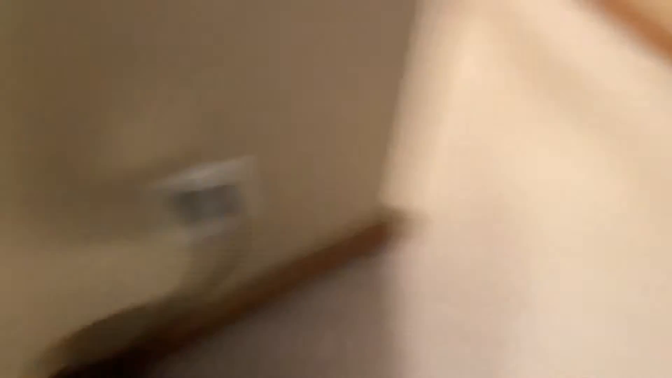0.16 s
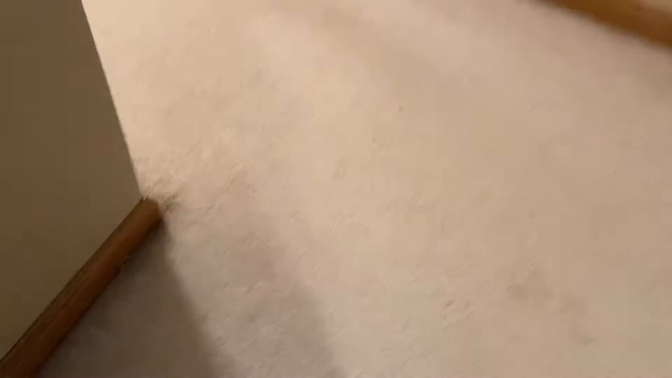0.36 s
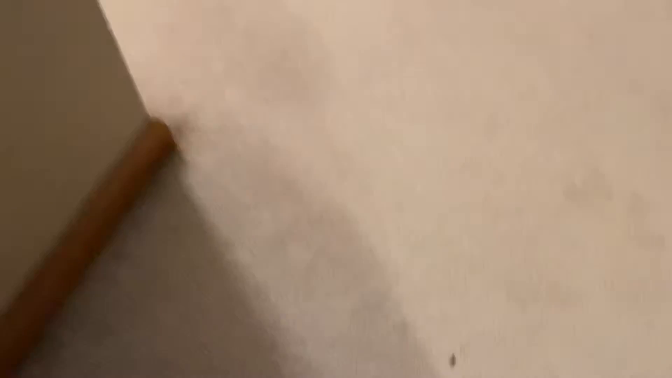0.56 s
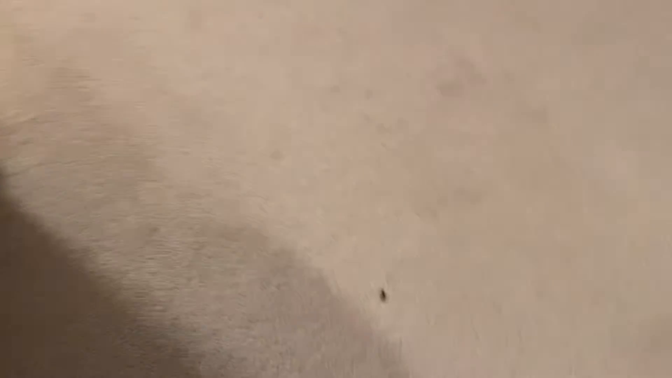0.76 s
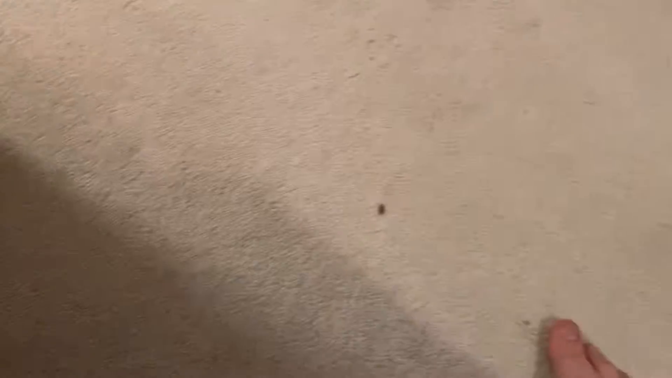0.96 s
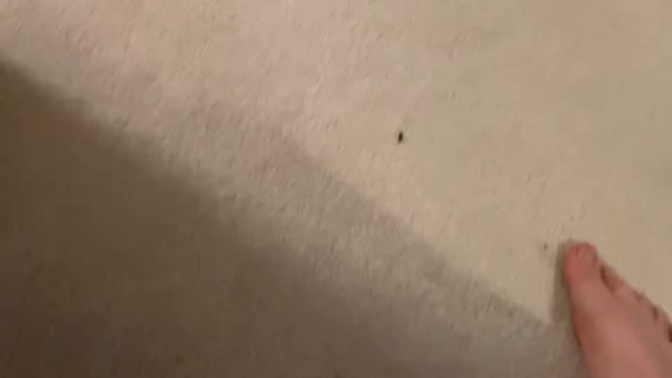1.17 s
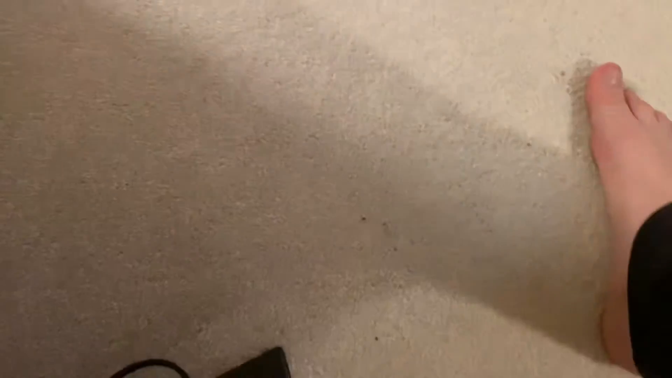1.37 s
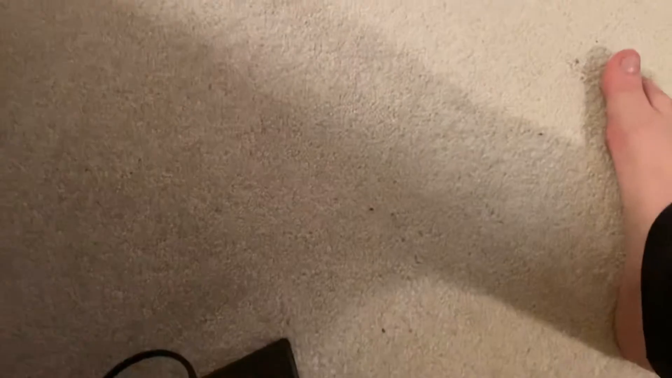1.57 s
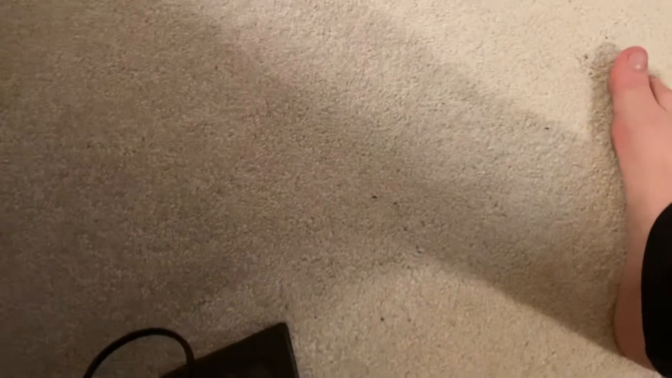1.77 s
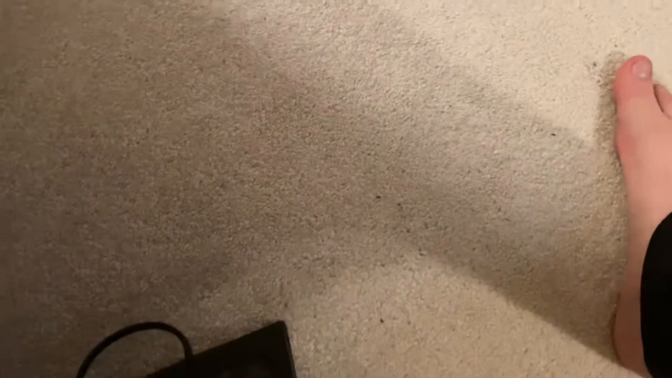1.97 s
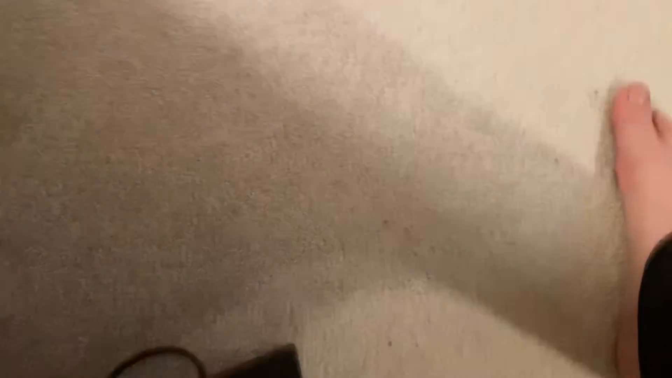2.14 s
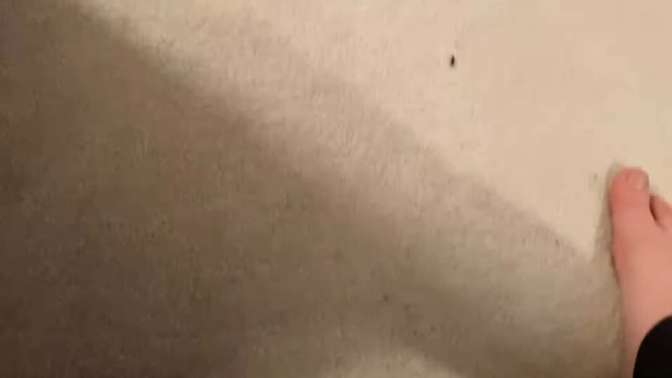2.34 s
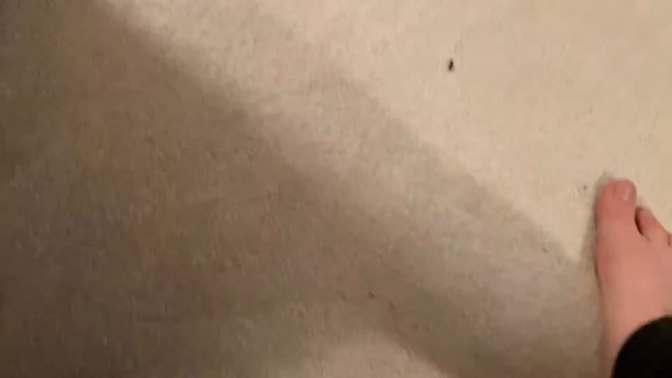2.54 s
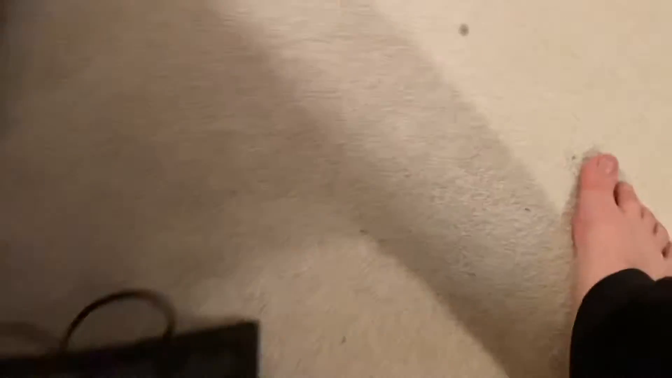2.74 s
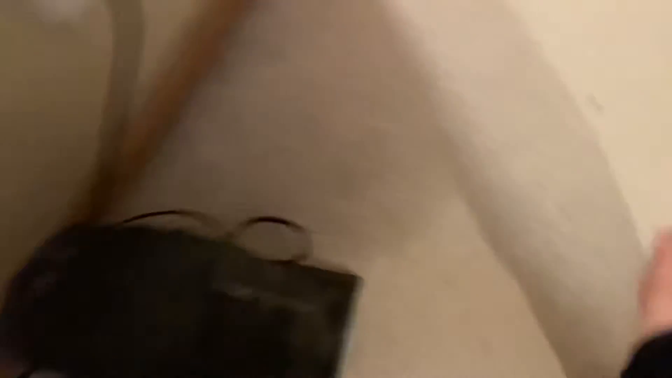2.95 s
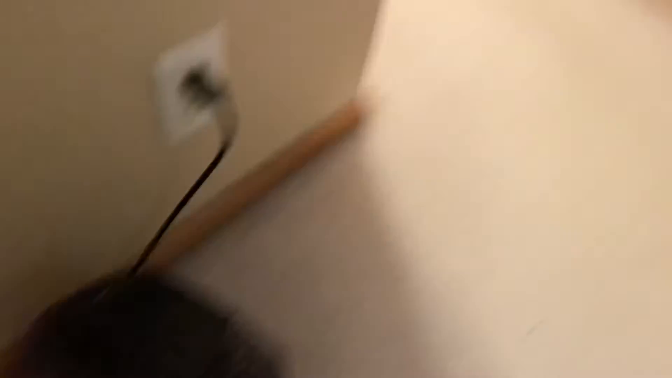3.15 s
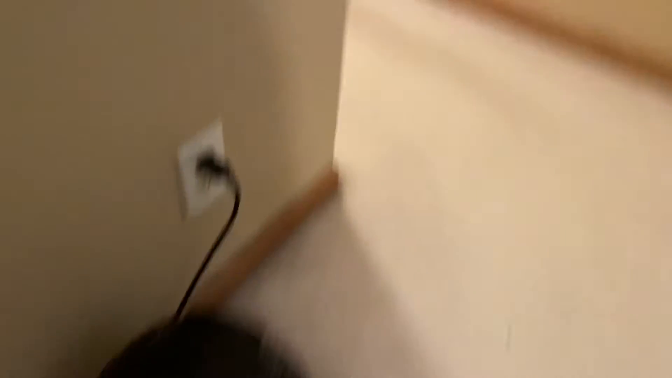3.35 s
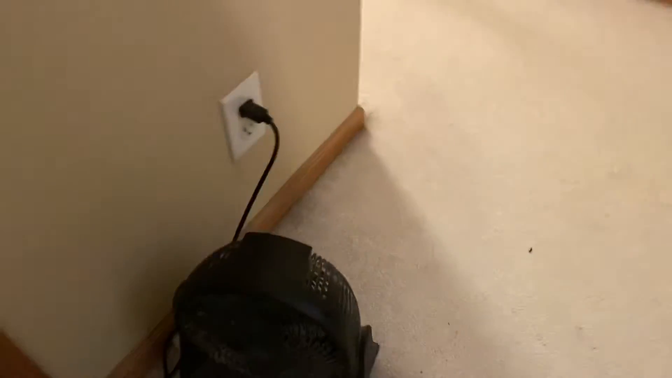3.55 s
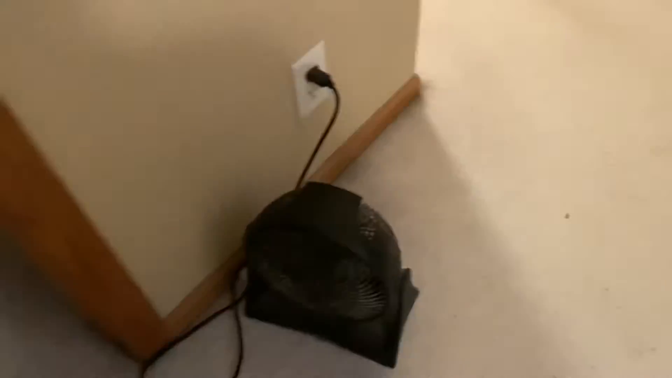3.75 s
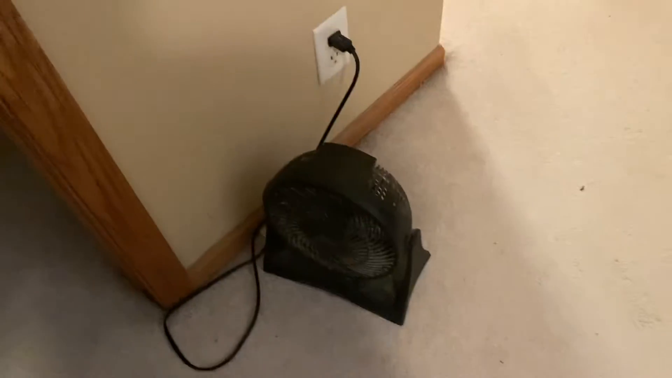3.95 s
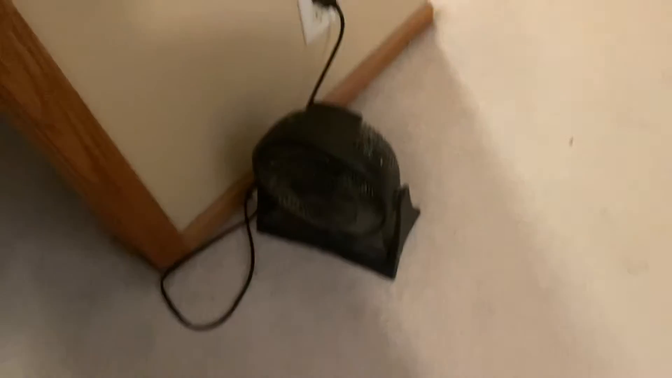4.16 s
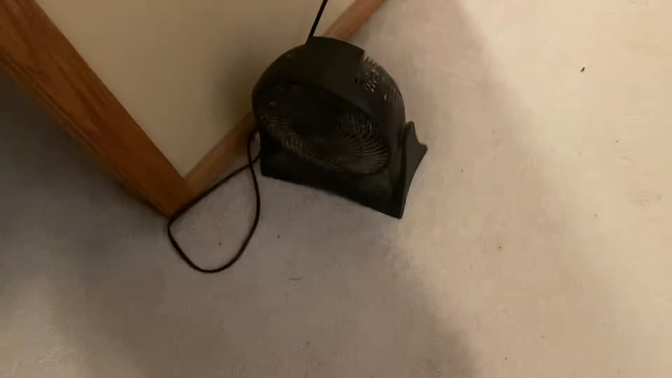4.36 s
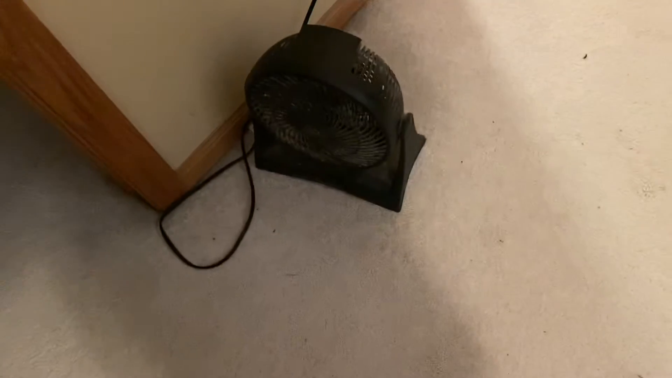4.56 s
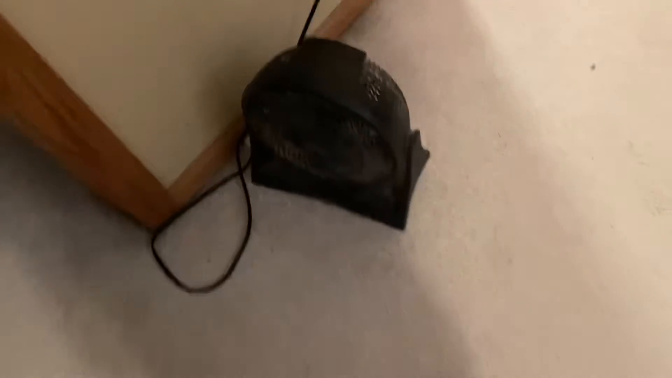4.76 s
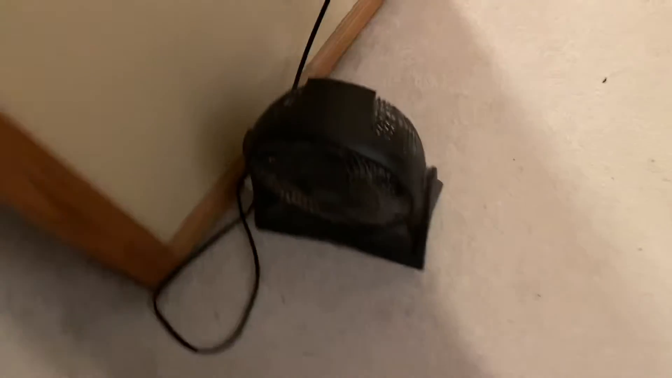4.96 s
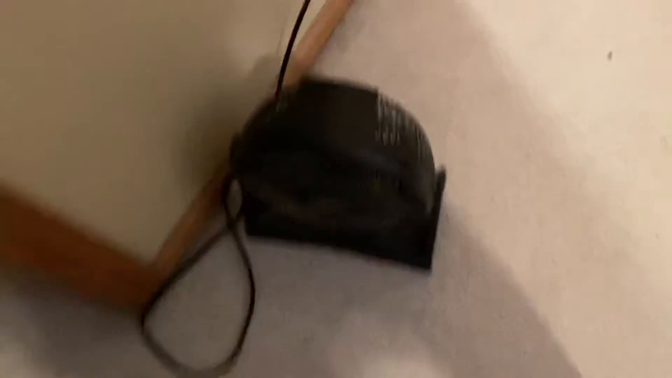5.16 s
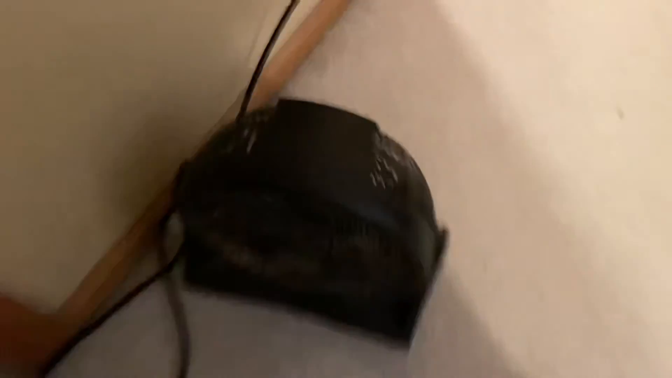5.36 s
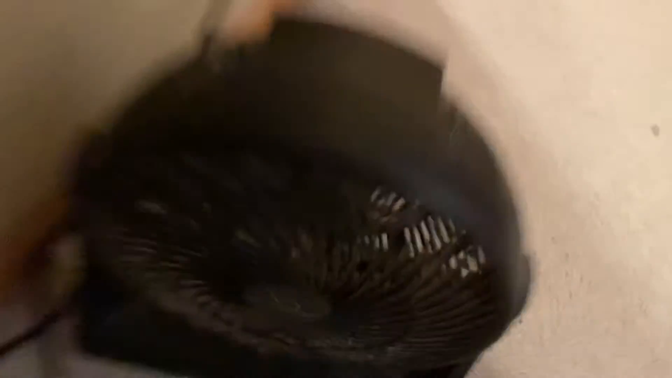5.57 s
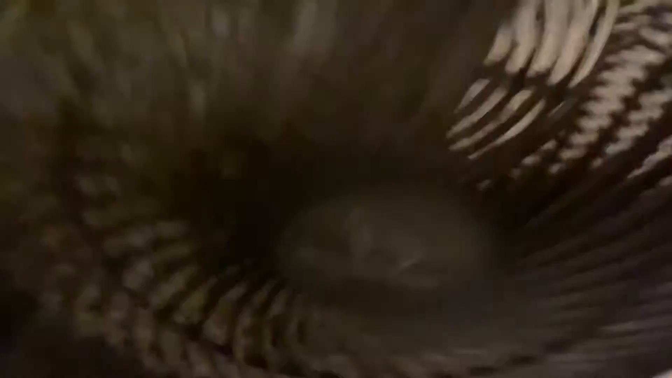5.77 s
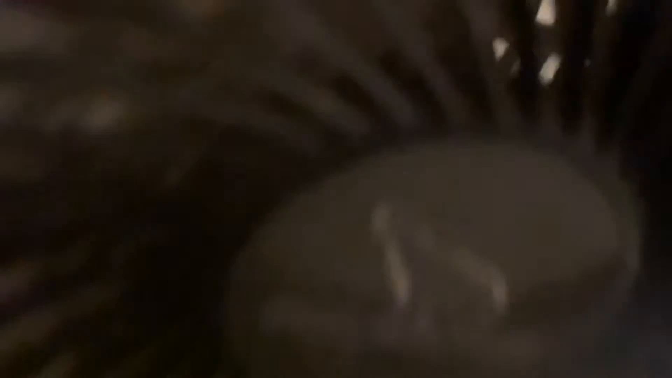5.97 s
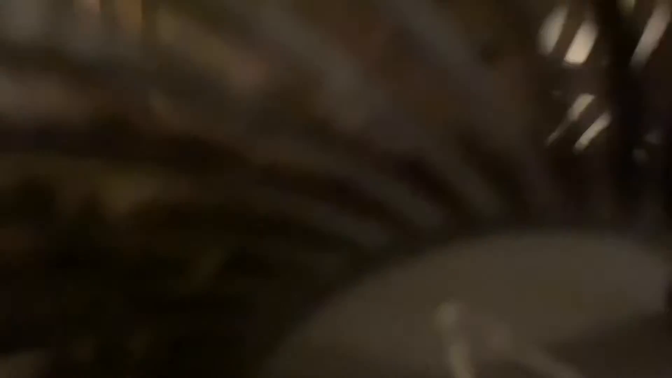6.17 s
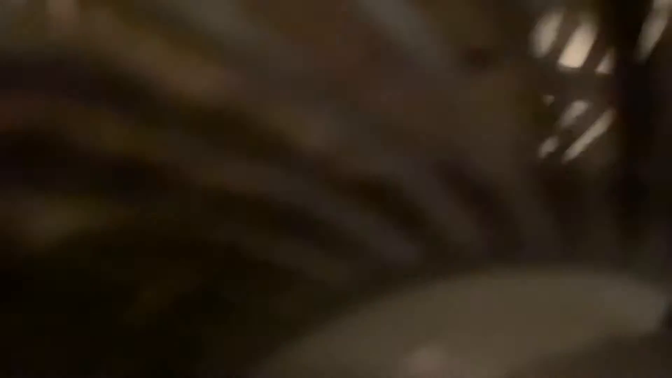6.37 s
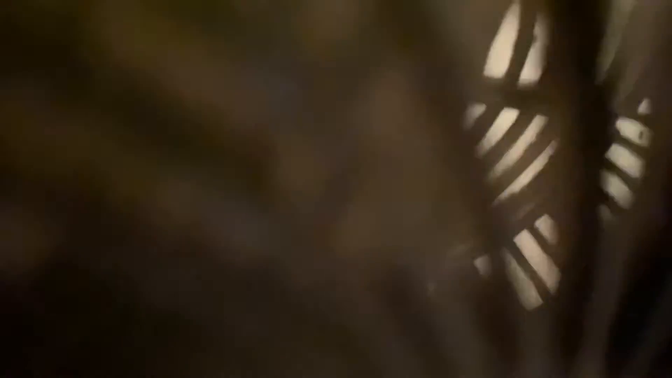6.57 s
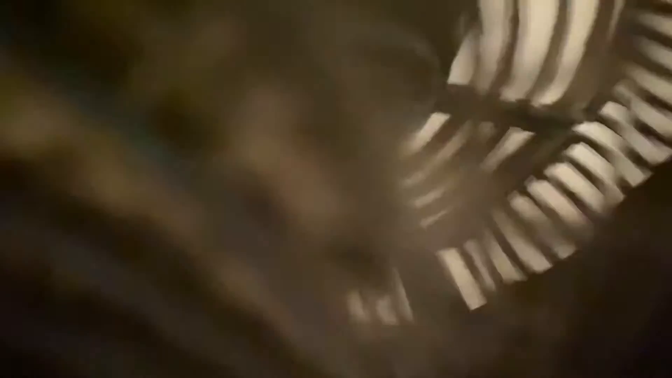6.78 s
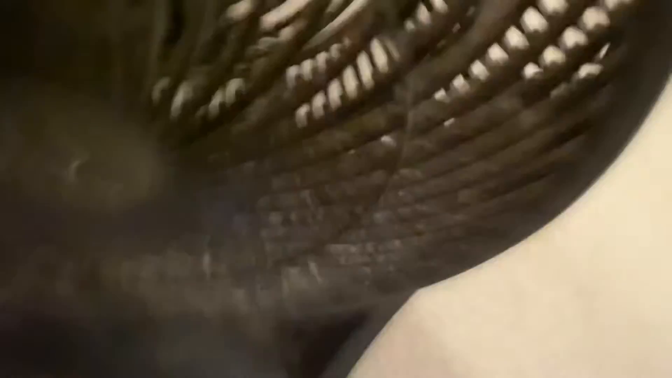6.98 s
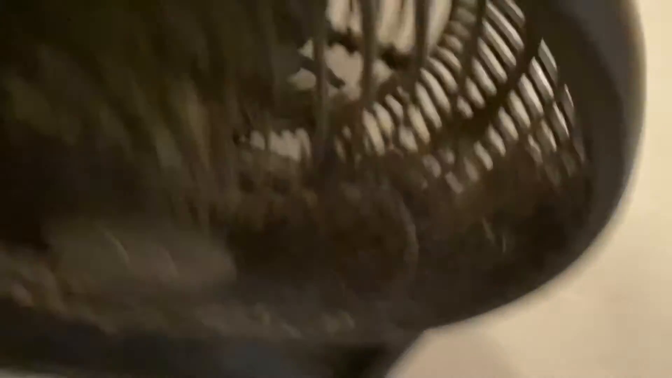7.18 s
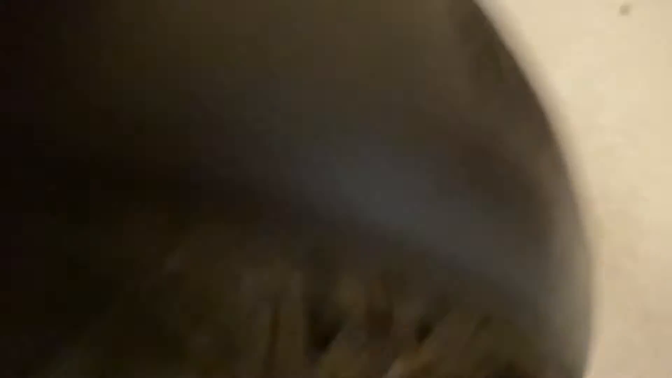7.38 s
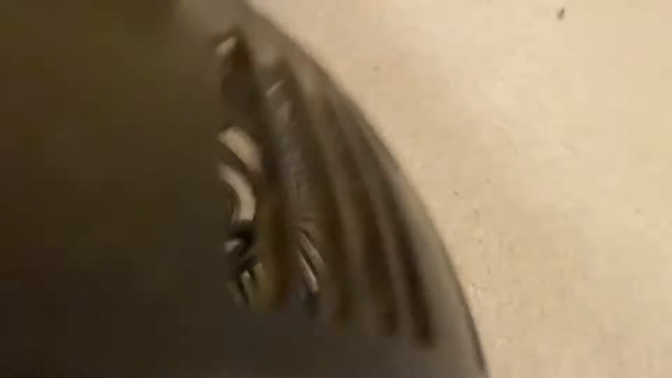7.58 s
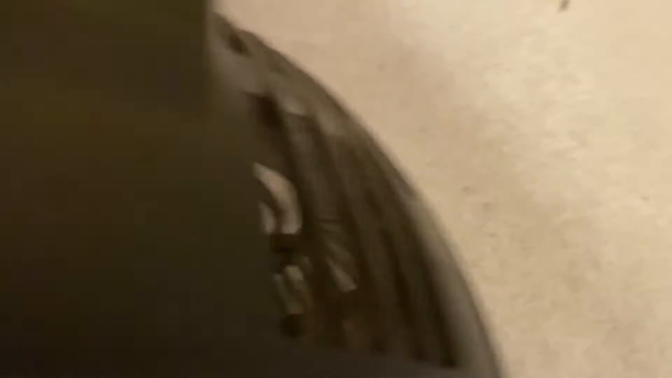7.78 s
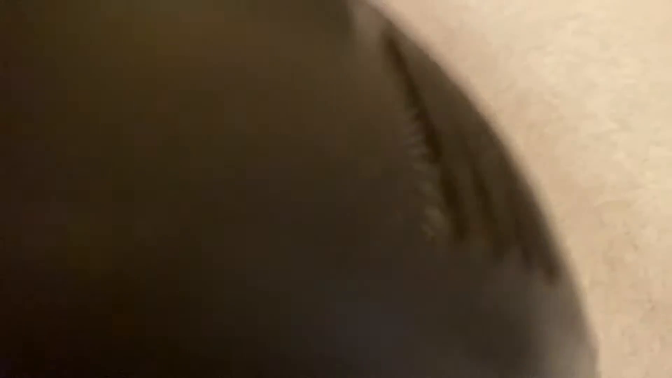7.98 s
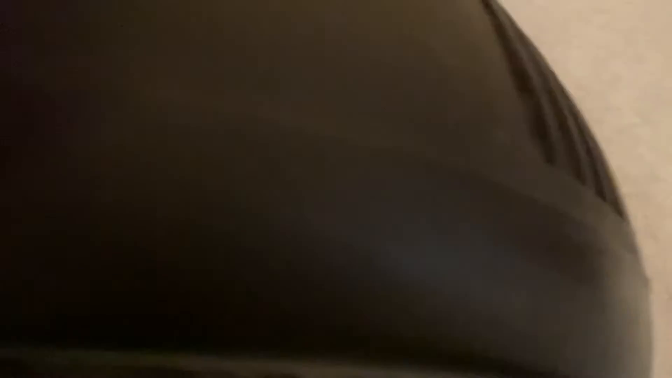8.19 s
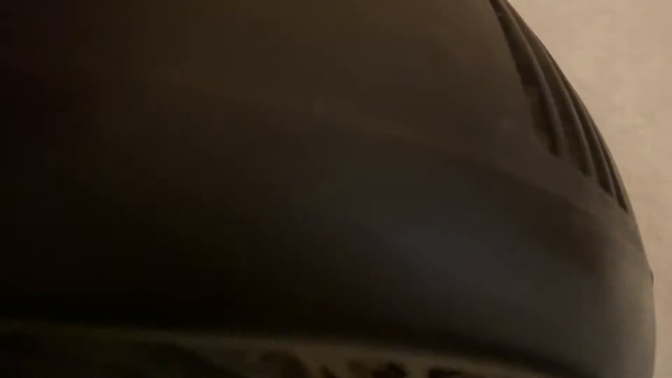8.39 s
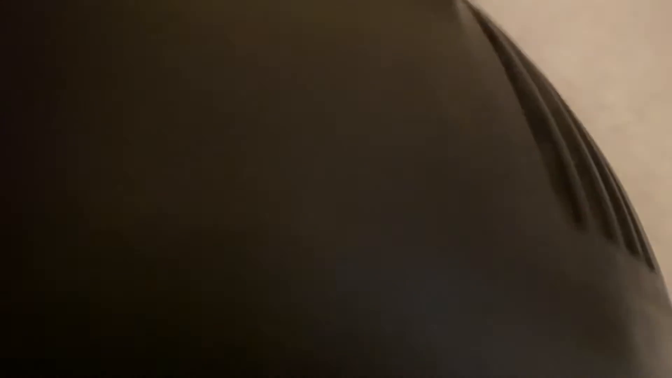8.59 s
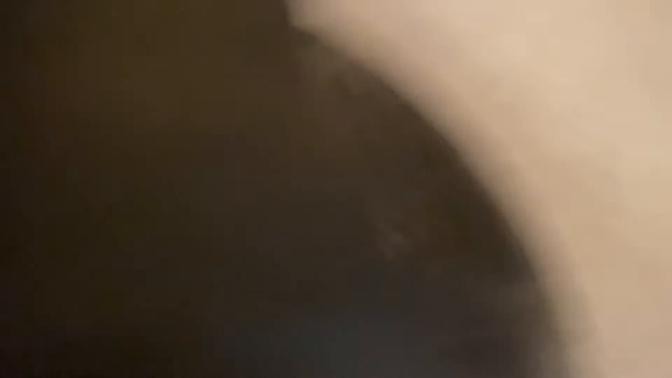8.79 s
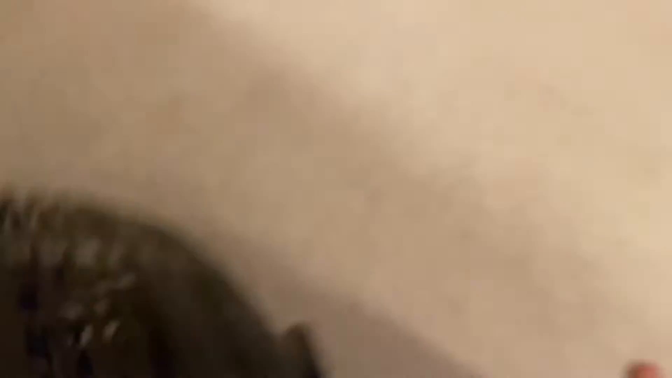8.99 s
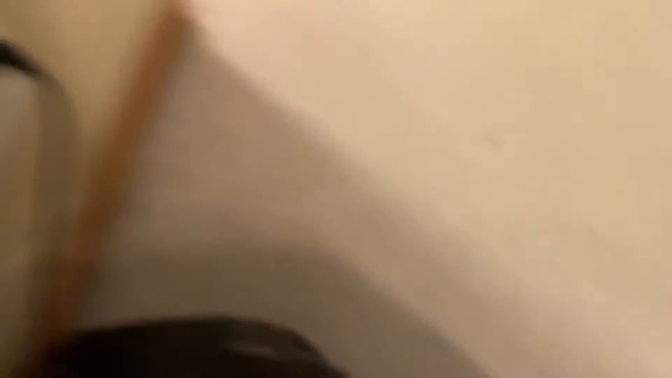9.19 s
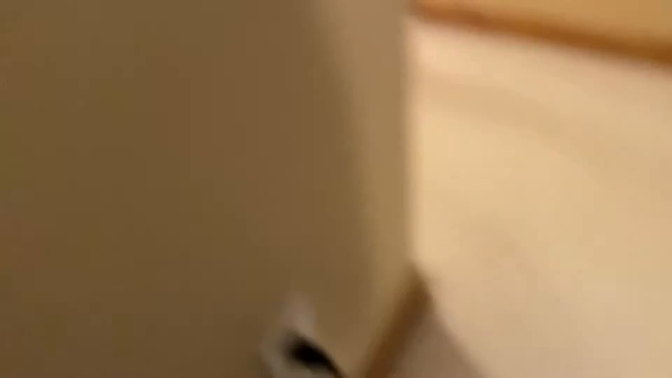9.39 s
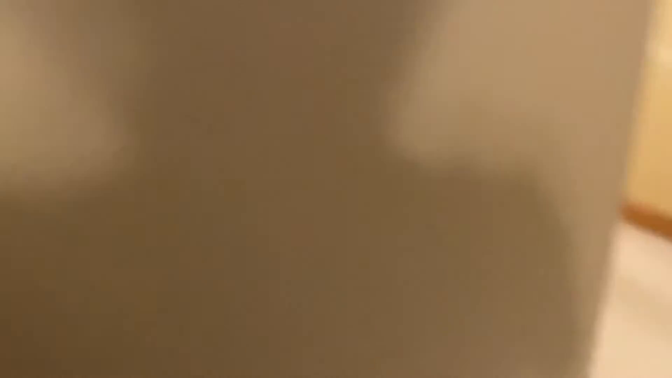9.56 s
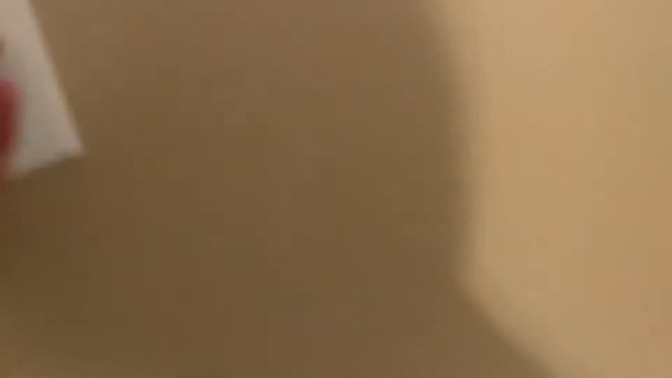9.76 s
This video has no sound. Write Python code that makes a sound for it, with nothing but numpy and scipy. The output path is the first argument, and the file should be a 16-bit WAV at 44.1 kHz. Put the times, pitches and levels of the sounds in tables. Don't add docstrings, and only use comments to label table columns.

```python
import sys
import numpy as np
from scipy import signal
from scipy.fft import rfft, irfft, next_fast_len
from scipy.io import wavfile
from scipy.ndimage import uniform_filter1d, map_coordinates

SR = 44100
rng = np.random.default_rng(int(sys.argv[2]) if len(sys.argv) > 2 else 0)


def wav_out(sig):
    wavfile.write(sys.argv[1], SR, np.round(np.clip(np.atleast_2d(sig).T, -1, 1) * 32767).astype(np.int16))


def gain_from_decibels(decibels):
    exponent = np.asarray(decibels, float) / 20
    return 10 ** exponent


N = 433503

ON_S, OFF_S = 2.3, 8.504
FULL_HZ = 143.2

# start_s, share_0_1
JET = [
    (5.6, 0),
    (5.85, 1),
    (6.6, 0.88),
    (6.9, 0.37),
    (7.1, 0.35),
]
# pitch_hz, width_hz, level_db
HALL_AND_CABINET_MODES = [(235, 19.5, 0), (394, 7.8, -4)]
# start_s, peak_db, knock_db, treble_db
HAND_TICKS = [(0.023, -41.5, 2, -1), (0.044, -45, -13, -8), (0.3087, -58, -20.5, -24),
              (0.4429, -52, -22, -23), (0.7722, -58, -8, -10), (0.8981, -30.5, -20, -9),
              (0.9091, -34.5, -19, -1.5), (0.9244, -42, -2, -13), (0.9677, -49, -15, -20),
              (1.162, -47, -28, -7.5), (1.177, -55, -19, -28), (1.296, -45.5, -12, -12),
              (1.5528, -51, -7, -33), (1.625, -71, -15, -30), (1.785, -62, -2, -20),
              (1.9063, -45, -18, -35), (1.964, -64, -20, -15), (2.0724, -57, -20, -25),
              (2.172, -62, -25, -20), (2.205, -64, -8, -30), (2.1, -40.5, -33, -6.5),
              (2.4244, -61, -17, -18), (2.855, -38.5, -22, -21), (3.1418, -57, -10, 1),
              (3.198, -54, 5, -25), (3.439, -55, -15, -32), (3.6147, -54, -15, -22.5),
              (3.6309, -50, -26, -22), (3.65, -49, -24, -27), (8.897, -39, -12, -22),
              (9.161, -44.5, -1, -38), (9.2616, -44, -10, -29), (9.2983, -44, -8, -34),
              (9.316, -45.5, -12, -31), (9.4894, -60, -15, -26), (9.678, -55, 10, -27)]
# start_s, peak_db, knock_db, treble_db
HOUSING_TAPS = [
    (4.8413, -34, -5, -9),
    (5.5614, -26, 3, -9.5),
    (6.516, -22, -24, -13),
    (6.697, -22, -6, -1.5),
    (7.9457, -25, -23, -16),
    (7.9671, -22, -11, -12),
    (8.5302, -33, -15, -19),
]
# start_s, peak_db, ring_s
SWITCHES = [
    (2.2806, -16.5, 0.027),
    (8.5415, -14, 0.033),
    (9.7973, -3.5, 0.1),
]


def unit(x):
    return x / np.sqrt(np.mean(x ** 2) + 1e-20)


def along(points, hz):
    f, v = np.transpose(points)
    return np.interp(np.log(hz + 1), np.log(f + 1), v)


def curves(rows):
    s, *cols = np.transpose(rows)
    return [np.interp(np.arange(N) / SR, s, c) for c in cols]


def wobble(rate_hz):
    knots = rng.standard_normal(int(N * rate_hz / SR) + 4)
    return map_coordinates(knots, [np.arange(N) * rate_hz / SR])


def filtered(x, response):
    m = next_fast_len(N + SR // 2)
    return irfft(rfft(x, m) * response(np.fft.rfftfreq(m, 1 / SR)), m)[..., :N]


def rush(spectrum, patchy_db):
    z = signal.stft(rng.standard_normal((2, N)), nperseg=512)[2]
    field = uniform_filter1d(rng.standard_normal(z.shape[1:]), size=6, axis=0)
    field = uniform_filter1d(field, size=12, axis=1)
    pair = signal.istft(z * gain_from_decibels(patchy_db * unit(field)), nperseg=512)[1][:, :N]
    return unit(filtered(pair, lambda hz: gain_from_decibels(along(spectrum, hz))))


def modes(rows):
    def response(f):
        total = 0
        for k, (c, w, db) in enumerate(rows):
            total = total + (-1) ** k * gain_from_decibels(db) * 1j * f * w / (c * c - f * f + 1j * f * w)
        return total
    return response


def speed():
    start_hz, climb_hz_per_s, drag = 43, 31.5, 0.0066
    brake_s, brake_hz, brake_rise_s, recover_s = 7.92, 13, 0.0954, 0.4145
    t = np.arange(N) / SR
    ramp = np.maximum(start_hz + climb_hz_per_s * (t - ON_S), 1)
    climb = (ramp ** -16. + FULL_HZ ** -16.) ** (-1 / 16)
    late = np.maximum(np.minimum(t, OFF_S) - brake_s, 0)
    running = climb - brake_hz * np.minimum(late / brake_rise_s, 1) * np.exp(-late / recover_s)
    return 1 / (1 / running + drag * np.maximum(t - OFF_S, 0))


def blade_tones(hz, turn, air_db, tone_db, near, jet, powered):
    # level_db, jet_change_db, coast_change_db
    multiples = [
        (1, 1.5, 3),
        (0, -12, 4),
        (-16, 0, 0),
    ]
    overtone_cap_db = 5.5
    standing = modes(HALL_AND_CABINET_MODES[:1])
    tones = 0
    for k, (db, jet_db, coast_db) in enumerate(multiples):
        capped_db = np.minimum(tone_db, overtone_cap_db if k else np.inf)
        shake_db = (0.9 + 2.4 * jet) * wobble(12) + 4 * (1 - near) * wobble(22)
        level_db = air_db + capped_db + db + jet_db * jet + coast_db * (0.5 - powered) * near + 0.5 + shake_db
        lift = 1 + 0.8 * (1 - near) * np.abs(standing((k + 1) * hz))
        tones = tones + gain_from_decibels(level_db) * lift * np.sin((k + 1) * turn)
    return tones


def motor_hum(air_db, jet, powered):
    hum_db, follows_air, buzz_fade_s = -16, 0.68, 0.79
    t = np.arange(N) / SR
    mains = 2 * np.pi * 120 * t
    level = powered * gain_from_decibels(hum_db + follows_air * air_db + 2.0 + 2.5 * jet + 1.7 * wobble(6))
    buzz = 0.28 * gain_from_decibels(4.5 * wobble(9.7)) * np.exp(-np.abs(t - ON_S) / buzz_fade_s)
    steady = np.sin(mains) + 0.26 * np.sin(2 * mains) + 0.086 * np.sin(4 * mains)
    return level * (steady + buzz * np.sin(6 * mains))


def rim_db(jet):
    return 2 * (1 - (2 * jet - 1) ** 2)


def rumble(air_db, wind_db, near, jet, powered):
    # level_hz, level_db_per_hz
    rumble_spectrum = [(13, -39), (30, 2), (92, -0.5), (130, -9), (170, -12), (290, -120)]
    floor_db, walk_s, walk_db = -56.5, 0.66, 9.5
    buffet_db, buffet_jet_db, coast_db = -1, -7.5, 4
    t = np.arange(N) / SR
    floor = gain_from_decibels(floor_db - walk_db * (t < walk_s))
    wind = gain_from_decibels(air_db + wind_db + buffet_db + buffet_jet_db * jet + coast_db * (1 - powered) + rim_db(jet))
    return gain_from_decibels(5.5) * np.hypot(floor, near ** 4 * wind) * rush(rumble_spectrum, patchy_db=-2.0)


def air(whoosh, grille, turn, air_db, bright_db):
    hiss_db, top_tilt, top_jet_db = -9, 0.27, 5
    flutter_db, steady_db = 2.2, -44
    jet = curves(JET)[0]
    eddies = np.array([wobble(25), wobble(25)])
    lumps = gain_from_decibels((1 + jet / 2) * eddies + (-14.0 - 0.72 * jet) * [[0], [1]])
    low = gain_from_decibels(air_db + rim_db(jet) + 2.5) * lumps * whoosh
    chop = 1 + 0.12 * np.sin(turn) + 0.25 * np.sin(2 * turn)
    flutter = 1.0 * jet + flutter_db * np.clip((steady_db - air_db) / 10, 0, 1)
    hiss = chop * gain_from_decibels(flutter * wobble(90)) * rush(grille, patchy_db=1.1)
    treble, top = filtered(hiss, lambda f: np.array([1 / (1 + (3500 / (f + 1)) ** 4), f > 9000])[:, None])
    bright_db = np.clip(bright_db, -30, 12)
    top_db = top_tilt * np.maximum(bright_db, -5) + top_jet_db * jet
    lift = (gain_from_decibels(bright_db) - 1) * treble + gain_from_decibels(bright_db) * (gain_from_decibels(top_db) - 1) * top
    return low + gain_from_decibels(air_db + hiss_db + 4) * (hiss + lift)


def fan():
    # start_s, closeness_db, tone_over_air_db
    hand = [(2.3, -43.5, -18), (3.6, -39.5, -15), (4.4, -38, -5.5), (5.4, -33.5, -7), (5.6, -28.5, -3.5),
            (5.8, -19, -4), (6.1, -16.5, 2), (6.4, -17, 2.5), (6.75, -17, 2.5), (7.0, -23, 3),
            (7.2, -25, 1), (7.65, -26, 11.5), (8.05, -25, 5), (8.54, -25.5, 6), (8.78, -28, 6),
            (9.0, -33.5, 2), (9.24, -40.5, -7), (9.6, -42.5, -10)]
    # start_s, treble_db, wind_db
    facing = [
        (5.3, 10.5, -2),
        (5.6, 7, -0.5),
        (5.85, 0.5, 1),
        (6.6, 0, -0.5),
        (6.85, 2, 2),
        (7.05, 4, -0.5),
        (7.25, 4, -1.5),
        (7.7, 1, 0.3),
        (8.5, 2, 0.2),
        (9, 3, -0.2),
    ]
    # start_s, share_0_1
    nearness = [
        (5.3, 0.2),
        (5.75, 0.96),
        (9, 1),
        (9.3, 0.1),
    ]
    # pitch_hz, level_db_per_hz
    whoosh_near, grille_near = [(70, -37), (100, 3), (150, 0), (250, -1), (400, -7.5), (700, -18),
                                (1200, -41), (4000, -66)], [(350, -2), (600, 0), (1000, -4), (1400, -5), (2100, -6.5),
                                                (2700, -9.5), (3200, -14), (5000, -20.5), (8000, -26),
                                                (12000, -33), (15600, -35), (16200, -72)]
    whoosh_far, grille_far = [(70, -10), (115, -22), (170, -7), (250, -2.5), (320, -5), (400, -2.5),
                              (550, -8.5), (750, -21.5), (1200, -40.5), (9000, -42), (15000, -53)], [(350, -22), (600, 2.5), (800, 0), (1100, -1), (1650, 2),
                                                  (2300, -6), (3500, -17.5), (5500, -38), (7500, -31),
                                                  (12000, -57), (15600, -60), (16200, -70)]
    air_db_per_decade = 53
    t, hz = np.arange(N) / SR, speed()
    close_db, tone_db = curves(hand)
    bright_db, wind_db = curves(facing)
    near, jet = curves(nearness)[0], curves(JET)[0]
    air_db = close_db + air_db_per_decade * np.log10(hz / FULL_HZ) - 60 * (t < ON_S)
    powered = uniform_filter1d(1. * (t > ON_S) * (t < OFF_S), size=2000)
    jitter = (0.0043 + 0.03015 * (1 - near)) * wobble(20) + 0.00498 * wobble(4)
    turn = 2 * np.pi * np.cumsum(hz * (1 + jitter)) / SR

    tones = blade_tones(hz, turn, air_db, tone_db, near, jet, powered)
    tonal = (tones + motor_hum(air_db, jet, powered)) * [[1], [0.35]]
    deep = rumble(air_db, wind_db, near, jet, powered) + tonal
    boom = filtered(rush(whoosh_far, patchy_db=1.0), lambda f: 1 + np.abs(modes(HALL_AND_CABINET_MODES)(f)))
    far_air = air(unit(boom), grille_far, turn, air_db, 0.69 * (air_db + 55.5))
    near_air = air(gain_from_decibels(wind_db) * rush(whoosh_near, patchy_db=1.0), grille_near, turn, air_db, bright_db)
    far = np.sqrt(1 - near) * (deep + far_air)
    return far, np.sqrt(near) * near_air + (1 - np.sqrt(1 - near)) * deep


def snaps():
    # pitch_hz, width_hz, level_db
    knob, dial, latch = [(770, 76, 1), (1750, 180, 1.5), (2680, 340, 2), (3460, 820, 0), (5950, 3000, -12),
                         (10700, 4800, -9.5)], [(1500, 520, 2), (2148, 650, 5.5), (2900, 680, 5), (4000, 900, -2),
                                       (5000, 900, -1.5), (7700, 1100, -2.5), (11600, 2500, -3.5),
                                       (14500, 2300, -2)], [(625, 290, -9), (970, 120, -4.5), (2070, 440, 0),
                                                     (2900, 320, 2), (3600, 530, -1), (4600, 690, -2.5),
                                                     (5400, 850, -9.5), (10500, 8100, -19)]
    out, t = np.zeros((2, N)), np.arange(SR // 8) / SR
    for (s, db, ring_s), body in zip(SWITCHES, (knob, dial, latch)):
        blow = np.zeros((2, N + SR))
        decay = gain_from_decibels(-60 * t / 0.016) + 0.24 * gain_from_decibels(-60 * t / ring_s)
        shape = (1 - np.exp(-(t / 0.00056) ** 2)) * decay
        blow[:, round(s * SR):][:, :len(t)] = gain_from_decibels(db + 4) * shape * rng.standard_normal((2, len(t)))
        out += filtered(blow[:, :N], modes(body))
    return out


def ticks():
    crack_s, rattle_s = 0.0094, 0.042
    parts, t = np.zeros((3, 2, N + SR)), np.arange(SR // 10) / SR
    decay = gain_from_decibels(-60 * t / crack_s) + 0.26 * gain_from_decibels(-60 * t / rattle_s)
    shape = (1 - np.exp(-t / 0.00067)) * decay
    for s, db, knock_db, treble_db in HAND_TICKS + HOUSING_TAPS:
        crack = gain_from_decibels(db + 9.0) * shape * rng.standard_normal((2, len(t)))
        at = round(s * SR)
        parts[..., at:at + len(t)] += crack * gain_from_decibels([knock_db + 11.0, 0, treble_db])[:, None, None]
    knock = modes([(380, 90, -0.9), (885, 180, 1.0)])
    body = modes([(1970, 1700, -4.0), (3830, 1400, -0.5)])
    treble = modes([(10100, 9800, 0)])
    return sum(filtered(part[:, :N], response) for part, response in zip(parts, (knock, body, treble)))


def pings():
    # start_s, level_db, pitch_hz, ring_s
    ping_rows = [(.7133, -53, 1100, .012), (.9015, -38.5, 856, 0.032), (.9145, -42, 785, .04),
                 (.9677, -44, 1650, 0.022), (1.117, -64, 2500, .008), (1.163, -49, 2900, 0.013),
                 (1.555, -48.5, 850, .025), (1.9105, -39.5, 800, 0.02), (2.283, -32, 770, 0.045),
                 (1.907, -39, 1310, 0.013), (2.281, -38, 1150, .02), (2.856, -37, 4600, .006),
                 (2.949, -50, 1500, 0.02), (3.015, -43, 1440, 0.012), (3.015, -57, 2300, 0.0069),
                 (9.2616, -41, 1700, .012), (9.262, -45, 850, .015), (9.679, -48, 1016, .012),
                 (9.679, -37, 570, .02), (3.073, -47, 1600, .012), (3.199, -41, 700, 0.018),
                 (3.314, -48, 2260, .04), (3.335, -46, 2260, .04), (3.355, -46, 2160, .04),
                 (3.378, -47, 2175, .03), (3.4, -50, 2150, .03), (.445, -56, 4050, .015),
                 (.447, -52, 2900, .015), (3.458, -53.5, 1600, .012), (9.161, -38, 1350, .02),
                 (9.798, -5.5, 3670, 0.012), (9.7978, -9, 5640, .006), (3.499, -45, 1615, .015),
                 (3.525, -55, 1600, 0.01), (3.579, -40, 1550, 0.016), (3.618, -45, 1500, 0.017),
                 (3.631, -36, 1590, 0.017), (3.657, -43, 1550, .015)]
    note, t = np.zeros(N + SR), np.arange(SR // 8) / SR
    for s, db, hz, ring_s in ping_rows:
        envelope = gain_from_decibels(db - 60 * t / ring_s) * (1 - np.exp(-t / 0.00044))
        note[round(s * SR):][:len(t)] += envelope * np.sin(2 * np.pi * hz * t)
    return note[:N] * [[1], [0.3]]


def cloth():
    # start_s, length_s, level_db, scuff_db
    strokes = [(0, 0.031, -48.5, 2), (0.052, 0.12, -59, -8), (0.16, 0.12, -59, -3),
               (0.32, 0.17, -69.5, -10), (0.423, 0.036, -66.5, -12), (0.49, 0.14, -68, 1),
               (0.6, 0.074, -69, 3), (0.705, 0.029, -70, 4), (0.74, 0.11, -75, 0), (0.854, 0.03, -72, 15),
               (1.365, 0.027, -76.5, 4), (1.777, 0.027, -81, 3), (1.908, 0.043, -70, 4),
               (2.603, 0.064, -74, -6), (0.888, 0.041, -57.5, 7.5), (0.943, 0.046, -65.5, 11),
               (0.992, 0.22, -74.5, -5), (1.994, 0.043, -64.5, 4), (2.26, 0.059, -56, 7),
               (2.54, 0.056, -72, 17), (2.674, 0.07, -68.5, 9), (2.758, 0.096, -59.5, 5),
               (2.845, 0.13, -68, -3), (3.134, 0.036, -64, 11), (3.183, 0.062, -68, 1),
               (3.307, 0.048, -51, -17), (3.348, 0.061, -51.5, -17), (3.575, 0.029, -74, -7),
               (3.61, 0.055, -56.5, -15), (9.136, 0.19, -64, 8), (9.333, 0.11, -71, 16),
               (2.899, .06, -74, -10), (0.122, .14, -73, 11), (.65, .07, -73, 9), (9.464, 0.073, -61, 8),
               (9.542, 0.1, -57, 10), (9.648, 0.08, -67, 12), (9.784, 0.014, -52, -5)]
    # pitch_hz, level_db_per_hz
    fabric, carpet = [(400, -25), (800, -5.5), (1700, -2), (2500, -2), (4500, -9), (8000, -14.5),
                      (12000, -16), (15600, -24), (16200, -70)], [(300, -5), (500, -7.5), (750, -8), (1100, -18), (1600, -49)]
    peak_share, edge_db, fade_db, catch_s = 0.7, 1, 23, 0.0094
    level, scuff = np.zeros((2, N + SR))
    t = np.arange(SR * 3 // 4) / SR
    grip = 1 - np.exp(-t / catch_s)
    for s, length_s, db, scuff_db in strokes:
        swell_db = np.interp(t, [0, peak_share * length_s, length_s], [-edge_db, 3, 0])
        swell_db = swell_db - fade_db * np.maximum(t / length_s - 1, 0)
        at = round(s * SR)
        level[at:][:len(t)] += gain_from_decibels(db + swell_db - 2.0) * grip
        scuff[at:][:len(t)] += gain_from_decibels(db + swell_db + scuff_db - 6.5) * grip
    grain = gain_from_decibels(1.1 * wobble(350) + 0.86 * wobble(90) + 0.58 * wobble(22))
    fabric_rub = level[:N] * unit(grain * rush(fabric, patchy_db=2.0))
    return fabric_rub + scuff[:N] * unit(grain * rush(carpet, patchy_db=4.0))


def sleeve():
    # start_s, length_s, level_db
    brushes = [
        (2.558, 0.055, -64),
        (2.605, 0.051, -60),
        (.2, .055, -61),
        (2.005, .03, -70),
        (9.56, 0.076, -60),
    ]
    # pitch_hz, level_db_per_hz
    sleeve_spectrum = [(1200, -30), (1600, 4), (2300, -1), (3100, -3), (3600, -29)]
    t, level = np.arange(N) / SR, np.zeros(N)
    for s, length_s, db in brushes:
        level += gain_from_decibels(db) * np.sin(np.pi * np.clip((t - s) / (1.6 * length_s), 0, 1))
    return level * rush(sleeve_spectrum, patchy_db=6.0)


def steps():
    # start_s, level_db, floor_hz, ring_s
    footfalls = [(0.031, -35.5, 89, 0.07), (.1, -45.5, 58.5, 0.51), (0.682, -40, 55.8, 0.98),
                 (0.872, -36, 160, 0.052), (0.903, -36.5, 338, 0.045), (1.108, -41, 60, 0.17),
                 (2.281, -43, 380, 0.11), (2.921, -48, 380, 0.37), (2.95, -39, 52.3, 0.27),
                 (3.131, -37.5, 62, 0.38), (3.202, -33, 386, 0.035), (3.23, -32, 48.6, 0.35),
                 (3.28, -44.5, 393, 0.73), (5.758, -7.5, 56, 0.14), (9.151, -24, 59.6, 0.17),
                 (9.381, -42, 435, 0.13), (9.681, -28.5, 147, 0.07), (9.799, -39, 327, 0.26),
                 (9.805, -36, 150, .15)]
    thud, t = np.zeros(N + SR), np.arange(SR) / SR
    for s, db, hz, ring_s in footfalls:
        envelope = gain_from_decibels(db - 60 * t / ring_s) * (1 - np.exp(-t / 0.0031))
        thud[round(s * SR):][:SR] += envelope * np.sin(2 * np.pi * hz * t)
    return thud[:N] * [[1], [0.3]]


def house_murmur():
    # pitch_hz, level_db_per_hz
    ducts = [(53, -30), (90, -11.5), (258, -9.5), (275, -18.5), (318, -9.5), (407, -23.5), (484, -23.5),
             (800, -42), (1040, -82), (1760, -120)]
    murmur_db, fridge_hz, fridge_db = -62, 484, -78.5
    note = gain_from_decibels(fridge_db + 3 * wobble(5.1)) * np.sin(2 * np.pi * fridge_hz * np.arange(N) / SR)
    return gain_from_decibels(murmur_db + 2.5) * rush(ducts, patchy_db=2.5) + note * [[1], [0.3]]


def still_air():
    # pitch_hz, level_db_per_hz
    still_spectrum = [(410, -30), (700, -2), (1030, -12), (1460, -13), (1900, -13), (2890, -17),
                      (4040, -24), (8000, -21), (11000, -16), (17600, -60)]
    return gain_from_decibels(-79.5) * rush(still_spectrum, patchy_db=1)


def room(x):
    # pitch_hz, t60_s
    decay_times = [(200, 0.26), (2000, 0.23), (10000, 0.064)]
    hz, t, z = signal.stft(rng.standard_normal((2, SR // 2)), SR, nperseg=256)
    tail = signal.istft(z * gain_from_decibels(-60 * t / along(decay_times, hz)[:, None]), SR, nperseg=256)[1]
    delayed = np.pad(x, ((0, 0), (300, 0)))
    return signal.fftconvolve(delayed, tail / np.linalg.norm(tail[0]), axes=1)[:, :N]


def ports(pair, lean, alike, lead):
    def response(hz):
        turn = np.arccos(np.clip(along(alike, hz), 0, 1)) / 2
        late = 2 * np.pi * np.maximum(hz - 6950, 0) / 4150
        half = gain_from_decibels(along(lean, hz) / 2) * np.exp(0.5j * (along(lead, hz) - late))
        left = [np.cos(turn) * half, np.sin(turn) * half]
        right = [np.cos(turn) / half, -np.sin(turn) / half]
        return np.array([left, right])
    return filtered(pair, response).sum(axis=1)


def scene():
    # pitch_hz, left_louder_db
    lean_near, lean_far = [(100, -1.5), (380, 5), (750, 10.5), (1500, 8.5), (2500, 4.5), (5800, 5),
                           (6500, 0)], [(100, -1.5), (400, -2.5), (900, 3), (1400, -1.5), (2900, 5.5),
                                         (5000, -3), (6500, -0.5)]
    # pitch_hz, port_likeness_0_1
    alike_near, alike_far = [(50, 0.97), (170, 0.86), (350, 0.76), (700, 0.62), (950, 0.85), (1200, 0.64),
                             (1550, 0.12), (2050, 0.76), (2750, 0.78), (3900, 0.97), (5500, 0.4),
                             (6400, 0.98), (16000, 0.96)], [(50, 0.68), (350, 0.73), (520, 0.39), (700, 0.54), (950, 0.28),
                                            (1300, 0.96), (2050, 0.25), (3900, 0.46), (5500, 0.37),
                                            (6400, 0.63), (16000, 0.81)]
    # pitch_hz, left_leads_rad
    lead_near, lead_far = [(50, 0.24), (170, 0.78), (520, 1.2), (950, 1.47), (1250, 2.65), (1550, 1.9),
                           (2050, 0.3), (2750, 0.82), (3900, 0.16)], [(170, 0.031), (520, 0.44), (700, 0.92), (1200, 0.38), (1600, 0.88),
                                         (2750, 0.67), (3900, 1), (5000, -.3), (6400, 0.11)]
    fan_far, fan_near = fan()
    hits = snaps() + ticks() + pings()
    near = fan_near + hits + cloth() + still_air()
    far = fan_far + sleeve() + steps() + house_murmur() + gain_from_decibels(-14) * room(hits)
    return ports(near, lean_near, alike_near, lead_near) + ports(far, lean_far, alike_far, lead_far)


def thinned(x):
    # low_hz, high_hz
    no_mid, no_side = [(8300, 9600), (12500, 13800), (15850, 22050)], [(6350, 7600), (10450, 11700), (14500, 22050)]
    busy_level = 0.002
    hz, t, z = signal.stft(np.array([x[0] + x[1], x[0] - x[1]]) / 2, SR, nperseg=1024)
    kept = np.array([1 - sum((hz > lo) & (hz < hi) for lo, hi in gaps) for gaps in (no_mid, no_side)])
    kept = kept[:, :, None]
    luck = rng.random((32, len(t) // 2 + 1)).repeat(2, axis=1)[(hz // 700).astype(int), :len(t)]
    busy = np.abs(z[0]).max(axis=0) > busy_level
    flicker = np.interp(hz, [13700, 13800, 15900], [0, 0.4, 0.65])[:, None]
    kept = kept * (luck + 0.3 * ~busy > flicker)
    fringe = ((hz > 8300) & (hz < 8700)) | ((hz > 12500) & (hz < 12900))
    kept[0] = np.maximum(kept[0], fringe[:, None] * (luck > 0.88))
    sharp_s = [s for s, *_ in SWITCHES]
    for s, db, _, treble_db in HAND_TICKS + HOUSING_TAPS:
        if db + treble_db > (-60 if s < 3 else -35):
            sharp_s.append(s)
    opened = np.min(np.abs(t - np.array(sharp_s)[:, None]), axis=0) < 0.007
    kept = np.maximum(kept, opened * (hz < 16200)[:, None])
    mid, side = signal.istft(z * kept, SR, nperseg=1024)[1][:, :N]
    return np.array([mid + side, mid - side])


def roll_off(x):
    return signal.sosfilt(signal.butter(12, 16970, fs=SR, output="sos"), x)


def record(dry):
    rounded = dry / (1 + np.abs(dry / 0.84) ** 5) ** (1 / 5)
    heard = filtered(rounded, lambda hz: 1j * hz / (30 + 1j * hz) / (1 + (39 / (hz + 1)) ** 10))
    mix = thinned(heard)
    return roll_off(mix)


dry = scene()
out = record(dry)
wav_out(out)
```